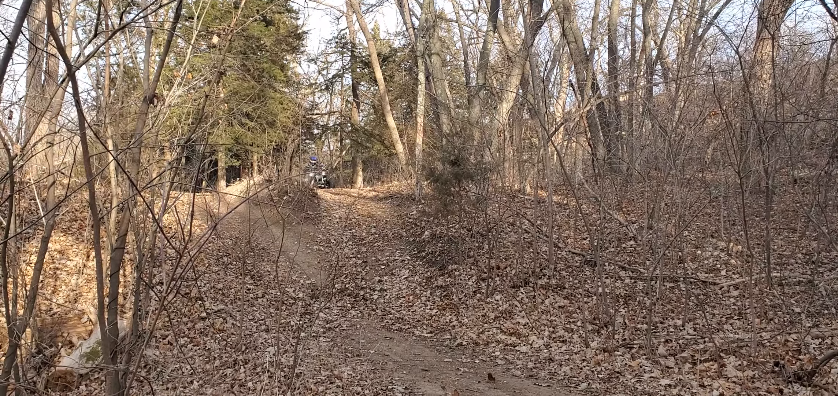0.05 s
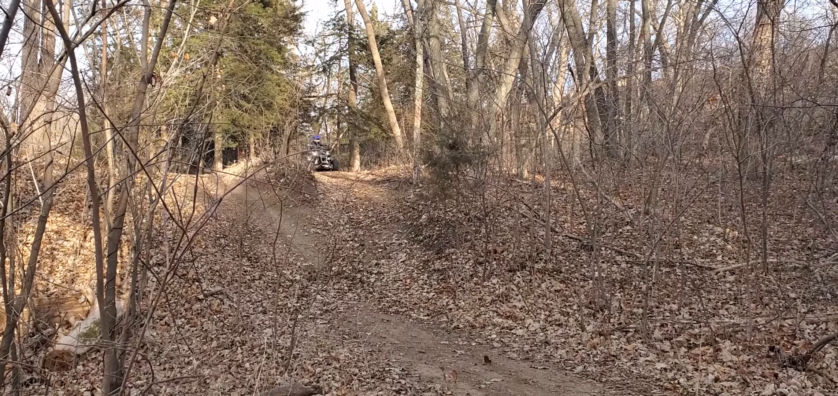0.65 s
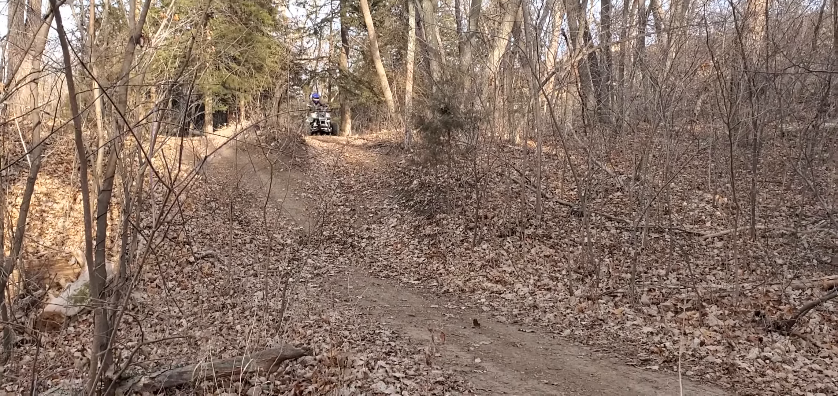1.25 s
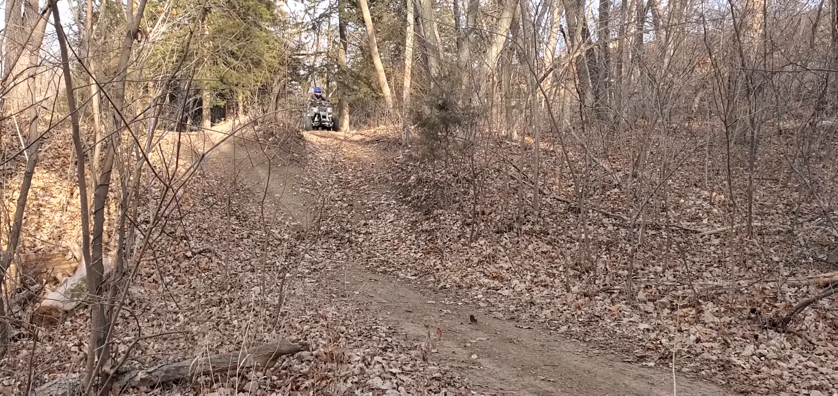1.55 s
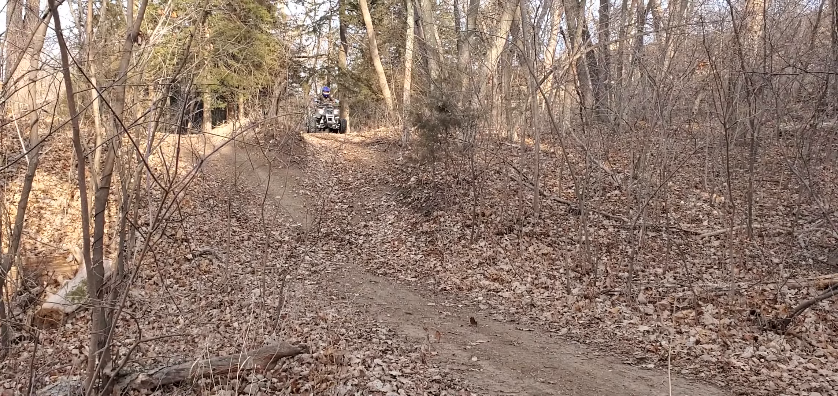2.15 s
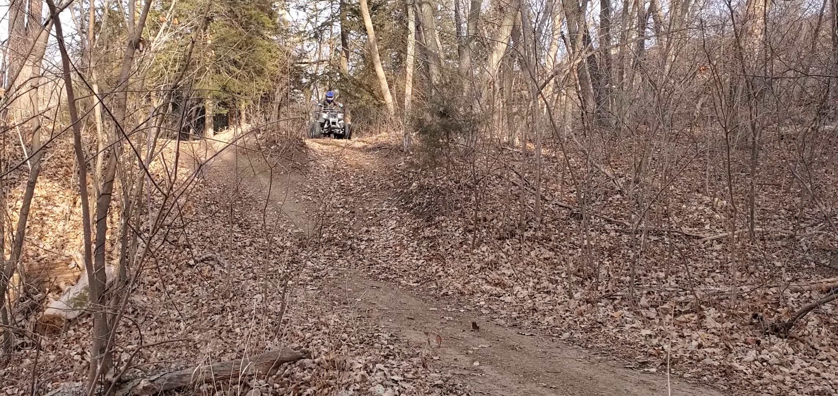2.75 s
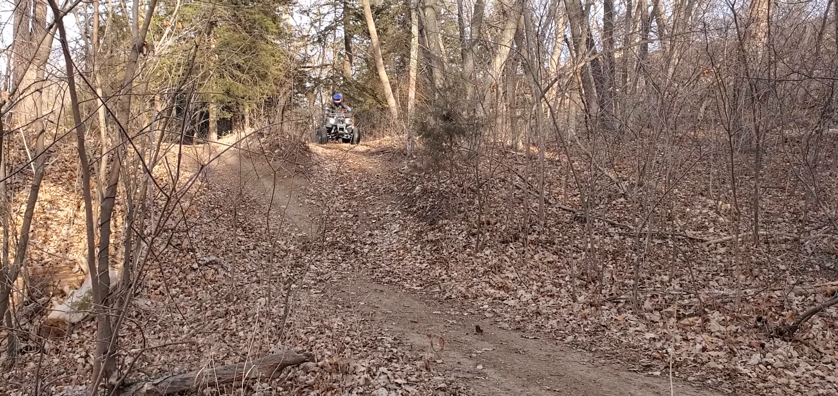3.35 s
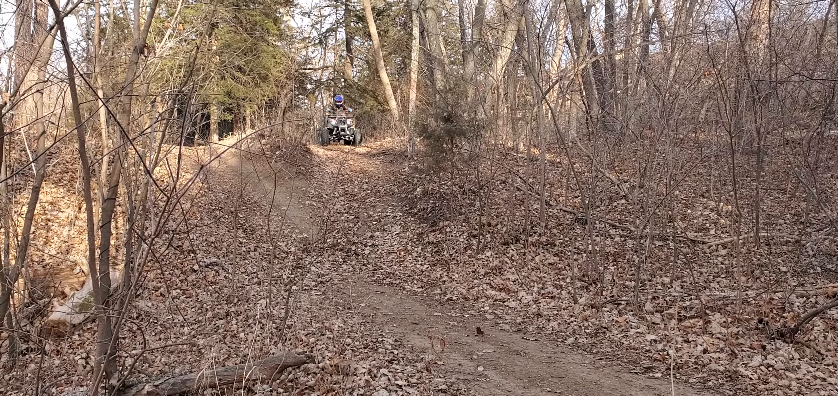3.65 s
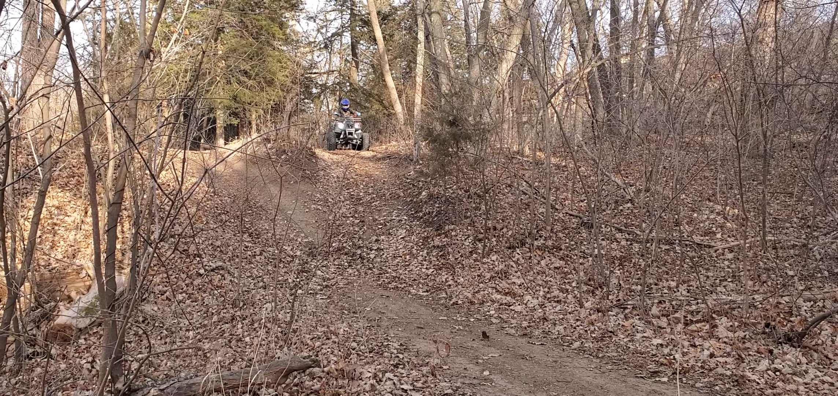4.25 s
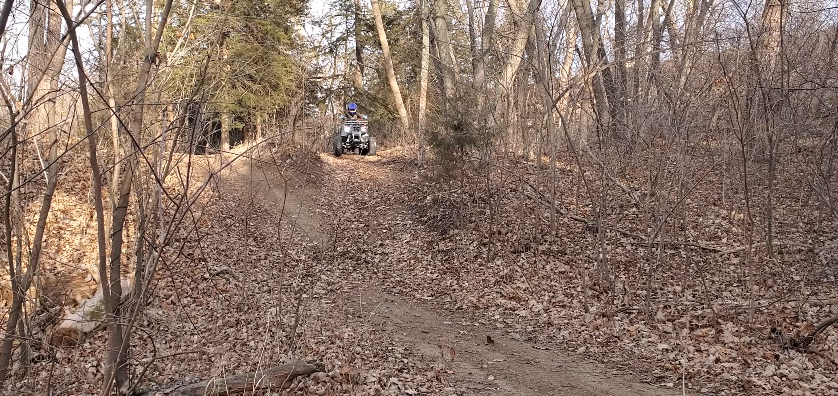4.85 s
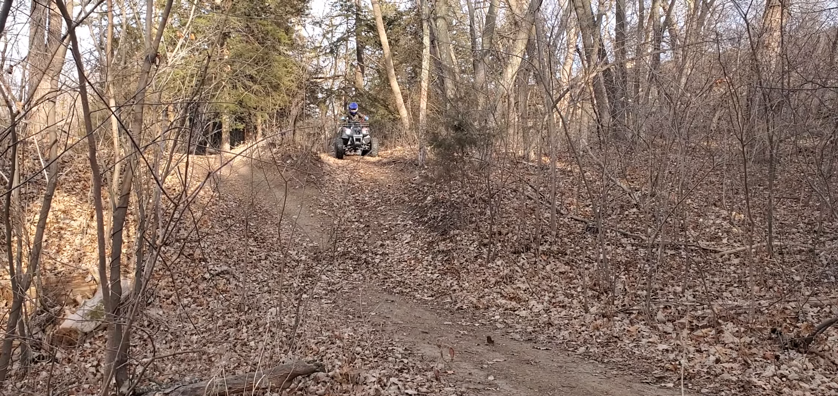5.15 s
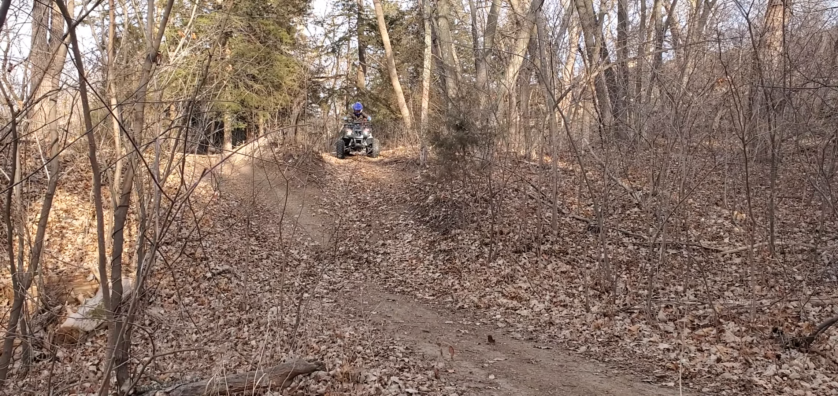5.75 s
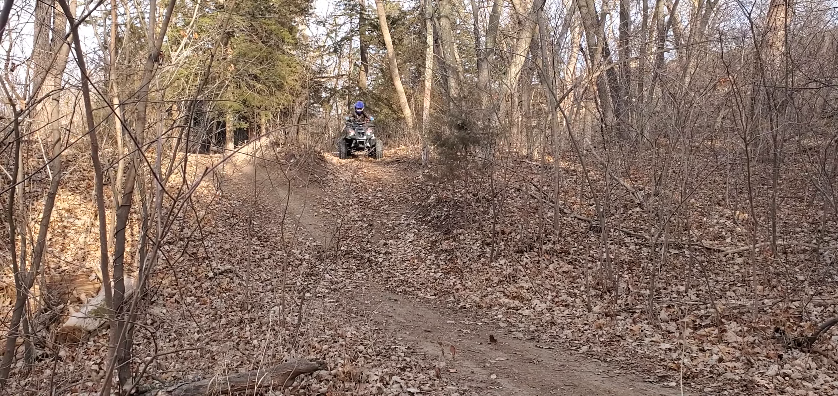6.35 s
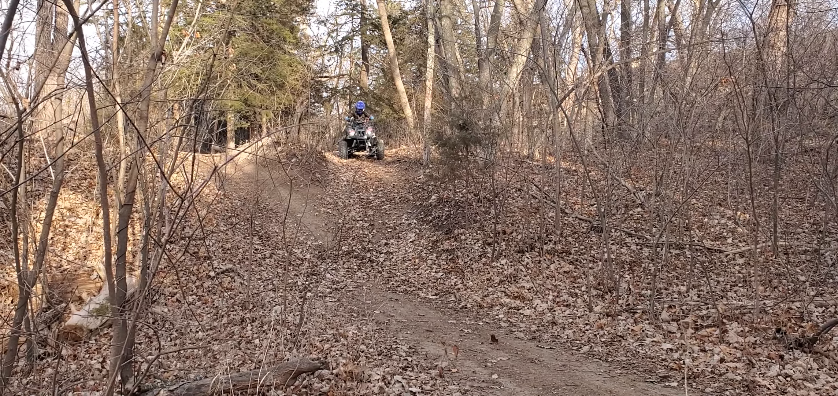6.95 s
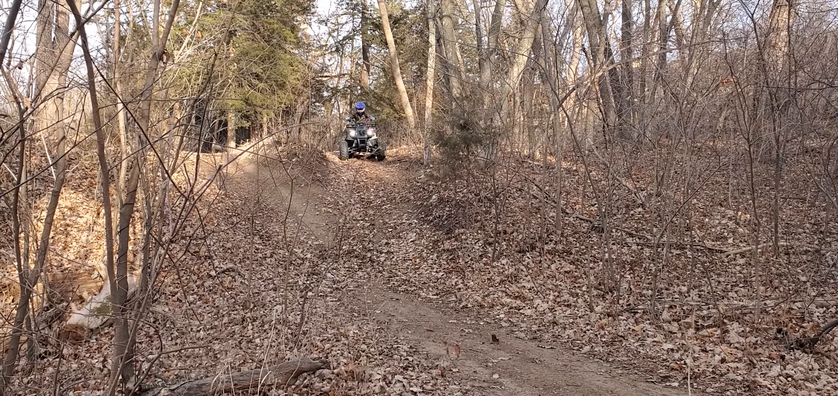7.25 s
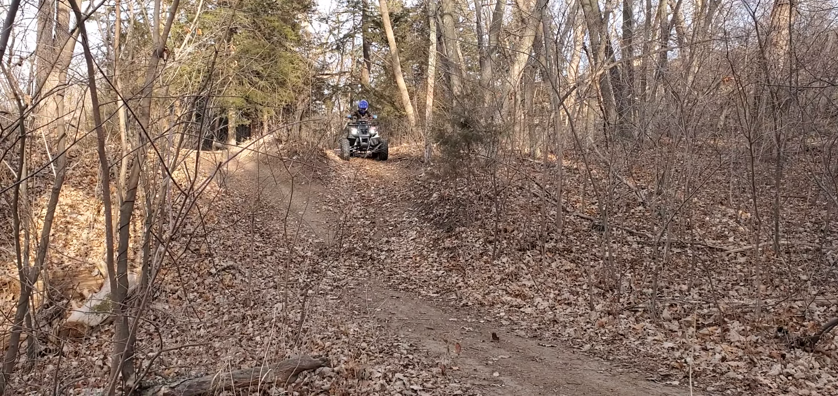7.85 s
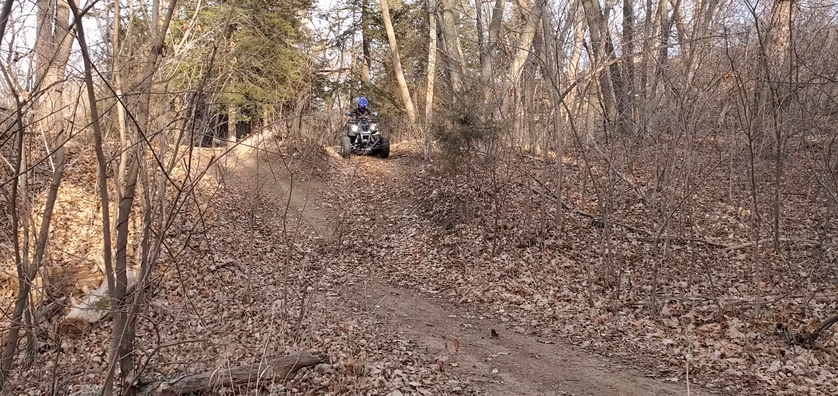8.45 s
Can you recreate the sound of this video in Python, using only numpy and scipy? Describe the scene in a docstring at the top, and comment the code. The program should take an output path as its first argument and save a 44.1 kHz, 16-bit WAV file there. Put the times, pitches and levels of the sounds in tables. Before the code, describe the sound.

Over the low, even beat of an idling engine, a quad bike approaches slowly through woods, revving in brief bursts and sinking back between them. Its thumping exhaust grows a little louder and barks on the hardest pulls in the second half. A few light hollow knocks mark bumps in the ground, while gears whirr and valves tick faintly to the left of the microphone, all with a short, soft outdoor echo.

```python
"""A quad bike thumps along a wooded trail, over the steady beat of a second, idling engine.
The bike creeps nearer in short surges of throttle. Each firing of its one cylinder thumps through
the silencer, and the escaping gas rasps, then barks under a hard pull. On the left its gears whirr
and its valves tick. A few hollow knocks come as it jolts over the ground, and the trees echo."""
import sys
import numpy as np
from scipy import signal
from scipy.fft import rfft, irfft, next_fast_len
from scipy.io import wavfile
from scipy.ndimage import uniform_filter1d, map_coordinates

SR = 44100
rng = np.random.default_rng(int(sys.argv[2]) if len(sys.argv) > 2 else 0)


def log_audio(samples):
    """Write samples as a 16-bit WAV file to the path given in sys.argv[1]."""
    # one column per channel
    frames = np.atleast_2d(samples).T
    # limit to full scale, then quantise
    limited = np.clip(frames, -1, 1)
    pcm = np.round(limited * 32767).astype(np.int16)
    wavfile.write(sys.argv[1], SR, pcm)


N = 383229

# Surges of throttle. Each row: opening and shutting time in seconds, firings per second
# it climbs towards and sinks back towards, load (1 is pulling hard).
THROTTLE_SURGES = [(.23, .7, 21.57, 15.33, .78), (1.78, 2.05, 16.99, 17, .5),
                   (2.05, 2.97, 21.29, 15.28, .82), (3.81, 4.15, 21.17, 15.62, .83),
                   (4.75, 5.07, 21.37, 15.29, .87), (5.81, 6.35, 23.88, 16.16, 1.07),
                   (6.92, 7.17, 24.03, 16.52, 1.03), (8.3, 8.56, 21.92, 14.56, .93)]


def amp(db):
    """Turn decibels into a gain."""
    return 10 ** (np.asarray(db) / 20)


def unit(x):
    """Scale a signal to an average power of 1."""
    return x / np.sqrt(np.mean(x ** 2) + 1e-20)


def along(points, hz):
    """Read between rows of frequency and value, on a logarithmic frequency scale."""
    freqs, values = np.transpose(points)
    return np.interp(np.log(hz + 1), np.log(freqs + 1), values)


def colour(points):
    """A filter curve from rows of frequency in Hz and level in dB."""
    return lambda hz: amp(along(points, hz))


def resonance(hz, width_hz):
    """The filter curve of something that rings at one pitch."""
    return lambda f: 1j * f * width_hz / (hz * hz - f * f + 1j * f * width_hz)


def filtered(x, response):
    """Pass a sound through a filter curve."""
    size = next_fast_len(N + SR // 8, real=True)
    return irfft(rfft(x, size) * response(np.fft.rfftfreq(size, 1 / SR)), size)[..., :N]


def noise(response, alike):
    """Filtered stereo noise; alike is the share that both sides have in common."""
    white = rng.standard_normal((3, N))
    return unit(filtered(np.sqrt(alike) * white[0] + np.sqrt(1 - alike) * white[1:], response))


def wobble(rate):
    """A smooth curve through rate random points a second."""
    points = rng.standard_normal(int(N * rate / SR) + 4)
    return map_coordinates(points, [np.arange(N) * rate / SR])


def place(x, balance, right_delay_s=.00014):
    """Sound from the left reaches the left ear earlier and louder."""
    def ears(hz):
        ratio = amp(along(balance, hz))
        return np.array([ratio, np.exp(-2j * np.pi * hz * right_delay_s)]) * 2 / (1 + ratio)
    return filtered(x, ears)


def ease(lags):
    """How much of a smooth change is still to come after this many lag times."""
    return (1 + lags) * np.exp(-lags)


def follow_throttle(before, opened, shut, rise_s, fall_s):
    """Ease towards one value as each surge opens and towards another as it shuts."""
    value, t = before * np.ones(N), np.arange(N) / SR
    for (opens, shuts, *_), high, low in zip(THROTTLE_SURGES, opened, shut):
        for start, goal, lag in ((opens, high, rise_s), (shuts, low, fall_s)):
            i = round(start * SR)
            value[i:] = goal + (value[i] - goal) * ease(t[:N - i] / lag)
    return value


def stroke(cycle, at, decay):
    """A level that jumps once per engine cycle and fades; at and decay are in cycles."""
    turn = cycle - at + 2
    strength = amp(1.2 * rng.standard_normal(size=400))[turn.astype(int)]
    return unit(strength * uniform_filter1d(np.exp(-(turn % 1) / decay), size=40))


def thumps(times, spectrum_db, size=8192):
    """One pressure pulse at each time; spectrum_db gives each its own tone."""
    cepstrum = irfft(np.log(amp(spectrum_db(np.fft.rfftfreq(size, 1 / SR)))))
    # folding keeps the tone and packs the energy at the start of the pulse
    fold = np.r_[1, np.full(size // 2 - 1, 2), 1, np.zeros(size // 2 - 1)]
    pulses = irfft(np.exp(rfft(cepstrum * fold)))
    at = np.round(times * SR).astype(int)[:, None] + np.arange(size) + SR
    return np.bincount(at.ravel(), pulses.ravel(), SR + N)[SR:SR + N]


def exhaust(cycle, load, far, lead_s=0.00227, spread_db=1.3):
    """Each firing thumps in the silencer; load makes it louder and sharper, distance duller."""
    # A firing with no load, one at full load, and the loss from the far end of the trail.
    # Each row: frequency in Hz, relative level in dB.
    coasting = [(15, -41), (42, -15), (62, -22.5), (90, 7.5), (120, -4), (148, -5.5), (172, -35), (195, -1),
                (235, -14.5), (300, -19), (375, -26), (440, -49.5), (800, -73), (2000, -71)]
    pulling = [(15, -43), (42, -16.5), (62, -5.5), (85, 3.5), (120, 8.5), (155, 10.5), (192, -9),
               (235, 3.5), (300, -4), (355, -5.5), (400, -16.5), (450, -51.5), (560, -21.5), (2000, -71.5)]
    distance_loss = [(60, -3), (90, -2), (130, -6), (220, -7), (400, -7.5)]
    fired = np.flatnonzero(np.diff(np.floor(cycle)))
    fired = np.r_[2 * fired[0] - fired[1], fired]  # the engine is already running
    at = np.maximum(fired, 0)
    pull, away = load[at, None], far[at, None]
    strength_db = 23.5 + spread_db * rng.standard_normal((len(fired), 1))
    def spectrum_db(hz):
        tone_db = (1 - pull) * along(coasting, hz) + pull * along(pulling, hz)
        return strength_db + tone_db + away * along(distance_loss, hz)
    return -thumps(fired / SR - lead_s, spectrum_db)


def rasp(cycle, load, revs, far):
    """Gas rushes from the pipe after each firing, louder with load and engine speed."""
    # The rushing gas. Each row: frequency in Hz, relative level in dB.
    gas_tone = [(200, -12), (400, 5.5), (530, 3.5), (640, -2.5), (800, -6), (1150, -28), (1550, -20.5),
                (2100, -36), (3200, -32.5), (9000, -60)]
    level_db = -71.5 + 11 * load + 1.15 * revs - 2.5 * far
    puffs = unit(0.77 + stroke(cycle, at=0.099, decay=0.29))
    return amp(level_db) * puffs * noise(colour(gas_tone), alike=0.78)


def idling_engine(firings_per_s=10.45, jitter_s=.0025, spread_db=0.96):
    """A second engine idles a little unevenly, each firing booming in its silencer."""
    # One boom. Each row: frequency in Hz, relative level in dB.
    boom_tone = [(20, -72), (42, -23), (56, -1.5), (68, -10), (82, 2.5), (100, 2), (114, 4), (135, -49.5),
                 (165, -18.5), (210, -21), (280, -26.5), (400, -36.5), (600, -77.5), (1500, -88.5)]
    chance = rng.standard_normal((91, 2))
    times = .037 + np.arange(len(chance)) / firings_per_s + jitter_s * chance[:, 0]
    return thumps(times, lambda hz: 30 + spread_db * chance[:, 1:] + along(boom_tone, hz))


def casing(cycle, revs):
    """Chain and gears whirr under a hiss; the valves shut twice a cycle and ring the metal."""
    # The casing at idle. Each row: time in seconds, relative level in dB.
    idle_levels = [(.1, -72), (.45, -69.5), (1.2, -65), (2.6, -65), (3.9, -64.5), (5, -63.5), (6.2, -63.5),
                   (6.85, -63.5), (7.6, -61.5), (8.6, -62)]
    # Brief swells of hiss. Each row: middle and half length in seconds, boost in dB.
    swells = [(.35, 0.26, 3.5), (3.41, .06, 7), (5.413, 0.13, 4), (7.607, 0.073, 3.5)]
    # The ringing metal. Each row: pitch in Hz, width in Hz, relative level in dB.
    metal_notes = [(3040, 190, 6), (4670, 49, 5), (5780, 130, -1), (6990, 89, 2.5), (10550, 100, -0.5),
                   (11500, 80, 2)]
    # The tone of each noise. Each row: frequency in Hz, relative level in dB.
    whirr_tone = [(400, 2.5), (800, 5.5), (1150, -2.5), (1500, 4), (1900, 0), (2300, -3), (2750, -9.5),
                  (3050, -11.5), (3450, -11.5), (4200, -7.5), (5400, -12), (7000, -12), (8000, -30),
                  (11000, -43)]
    hiss_tone = [(4410, -10), (7500, -10.5), (9330, -7), (10400, -4), (13100, 1.5), (14400, -0.5),
                 (15200, -0.5), (15600, -7.5)]
    tick_tone = [(1500, -37), (3300, -24), (4200, 3.5), (5500, 1.5), (7000, 5), (8500, -7), (11500, 0),
                 (15500, -0.5)]
    t = np.arange(N) / SR
    level_db = np.interp(t, *np.transpose(idle_levels))
    early_valve = stroke(cycle, at=0.181, decay=0.16)
    late_valve = stroke(cycle, at=0.488, decay=0.27)
    firing = stroke(cycle, at=-0.079, decay=0.61)
    tap = stroke(cycle, at=.51, decay=.075)

    whirr = amp(level_db - 0.42 + 0.9 * revs) * noise(colour(whirr_tone), alike=0.28)
    whirr *= unit(1 + 0.091 * early_valve)

    metal = lambda f: sum(amp(db) * resonance(hz, width)(f) for hz, width, db in metal_notes)
    ring = amp(-12.5) * noise(metal, alike=0.12)
    ring += amp(-13 + 0.2 * wobble(4)) * noise(resonance(hz=3824, width_hz=45), alike=.2)
    ring += amp(-17.5) * noise(resonance(hz=4370, width_hz=69), alike=0.25)
    ring *= amp(level_db + 0.79 * revs) * unit(1 + 0.49 * early_valve + 0.83 * late_valve)

    swell_db = sum(db * np.exp(-((t - middle) / half) ** 2) for middle, half, db in swells)
    hiss_db = level_db - 2.5 + 0.9346 * revs + swell_db + 0.59 * wobble(7)
    hiss_pulse = unit(1 + 0.55 * early_valve + 0.3 * late_valve + 0.45 * firing)
    hiss = amp(hiss_db) * hiss_pulse * noise(colour(hiss_tone), alike=.05)

    ticks = amp(-54 + 0.32 * level_db - 0.05 * revs) * tap * noise(colour(tick_tone), alike=.1)
    return whirr + ring + hiss + ticks


def woods(thumping, sharp):
    """Trunks scatter the sound into a soft echo; long bass waves mostly pass them by."""
    # What the trees return of the thumps. Each row: frequency in Hz, relative level in dB.
    returned = [(80, -17.5), (160, -14), (300, -8.5), (600, -6.5)]
    # The echo's length. Each row: frequency in Hz, seconds to fade by 60 dB.
    fade_times = [(100, 0.61), (600, 0.45), (2000, 0.43), (8000, 0.28)]
    scattered = filtered(thumping, colour(returned)) + amp(-7) * sharp
    delayed = np.pad(scattered, ((0, 0), (SR // 50, 0)))
    hz, t, bands = signal.stft(rng.standard_normal((2, SR)), SR, nperseg=256)
    tail = signal.istft(bands * amp(-60 * t / along(fade_times, hz)[:, None]), SR, nperseg=256)[1]
    tail /= np.sqrt(np.mean(np.abs(rfft(tail)[:, 300:2000]) ** 2))  # gain of 1 in the middle range
    return signal.fftconvolve(delayed, tail, axes=1)[:, :N]


def still_air():
    """A faint, gently wavering hush among the trees."""
    # The hush. Each row: frequency in Hz, relative level in dB.
    air_tone = [(25, 0), (100, -30), (300, 11), (600, -2), (1500, -21), (3000, -33), (8000, -36),
                (13000, -34)]
    return amp(-66 + 1.6 * wobble(1.74)) * noise(colour(air_tone), alike=0.68)


def bark(cycle, load, revs, far):
    """Under a hard pull each firing cracks out of the pipe, harder as the engine speeds up."""
    # The crack. Each row: frequency in Hz, relative level in dB.
    crack_tone = [(300, -3), (480, 9), (640, 1), (820, 6.5), (1020, -4.5), (1200, -5.5), (1500, -3),
                  (2100, -15.5), (3050, -12.5), (4500, -37), (9000, -51)]
    level_db = -55 + 48 * (load - 1) + 0.8547 * revs - 7 * far
    cracks = unit(0.66 + stroke(cycle, at=-.04, decay=.1))
    return amp(level_db) * cracks * noise(colour(crack_tone), alike=0.72)


def knocks(fade_s=0.04, attack_s=0.0022, width_hz=380, size=8192):
    """Short hollow knocks as the bike jolts over the ground, each at its own pitch."""
    # The jolts. Each row: start in seconds, relative level in dB, pitch in Hz.
    jolts = [(3.416, -36.5, 670), (3.468, -34.5, 640), (3.512, -41, 665), (5.262, -33.5, 764),
             (5.301, -30, 756), (5.352, -32.5, 653), (6.733, -37, 895)]
    # The tone they share. Each row: frequency in Hz, relative level in dB.
    hollow_tone = [(300, -17), (500, 0.5), (640, 4.5), (900, -3), (1050, -16), (1600, -15), (4000, -40)]
    out = np.zeros(N + size)
    t, hz = np.arange(size) / SR, np.fft.rfftfreq(size, 1 / SR)
    envelope = amp(-60 * t / fade_s) * (1 - np.exp(-t / attack_s))
    for start, db, pitch_hz in jolts:
        response = resonance(pitch_hz, width_hz)(hz) * colour(hollow_tone)(hz)
        body = irfft(rfft(rng.standard_normal(size)) * response)
        out[round(start * SR):][:size] += amp(db - 2) * envelope * unit(body)
    return out[:N]


def scene(start_rate=18.19, settled_rate=17.36, idle_rate=15.3, coast_load=0.49, spin_down_s=.078):
    """Drive the bike and mix it with the other engine and the woods; rates are firings a second."""
    # Left-right balance. Each row: frequency in Hz, how many dB louder on the left.
    exhaust_left = [(90, -1.5), (170, 1.5), (330, 2.5), (700, 4.5), (1400, 10), (2800, 17), (6000, 13)]
    casing_left = [(700, 6.5), (1400, 14.8), (2800, 15.7), (5500, 26.3), (10000, 27), (14000, 28)]
    _, _, high_rates, low_rates, pulls = np.transpose(THROTTLE_SURGES)
    settling = settled_rate + (start_rate - settled_rate) * ease(np.arange(N) / SR / spin_down_s)
    # the flywheel makes the speed lag behind the throttle
    speed = follow_throttle(settling, high_rates, low_rates, rise_s=.045, fall_s=spin_down_s)
    load = follow_throttle(coast_load, pulls, np.full(len(pulls), coast_load), rise_s=.015, fall_s=.022)
    revs = speed - idle_rate  # speed above idle
    far = np.linspace(1, 0, N)  # the bike creeps nearer at an even pace
    cycle = .22 + np.cumsum(speed) / SR  # counts up by one per firing
    thumping = place(exhaust(cycle, load, far) + idling_engine(), exhaust_left)
    sharp = place(rasp(cycle, load, revs, far) + bark(cycle, load, revs, far) + knocks(), exhaust_left)
    surroundings = woods(thumping, sharp) + still_air()
    return thumping + sharp + surroundings + place(casing(cycle, revs), casing_left)


def record(dry, top_hz=15800):
    """Cut off the very highest treble."""
    return filtered(dry, lambda hz: hz < top_hz)


dry = scene()
out = record(dry)
log_audio(out)
```